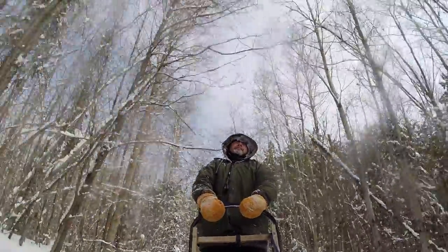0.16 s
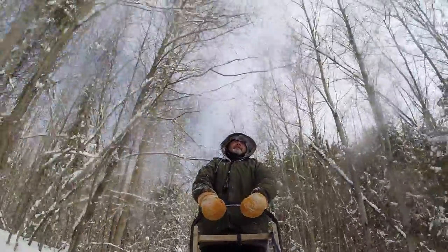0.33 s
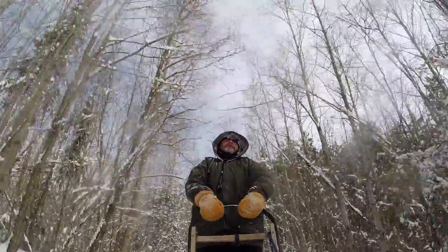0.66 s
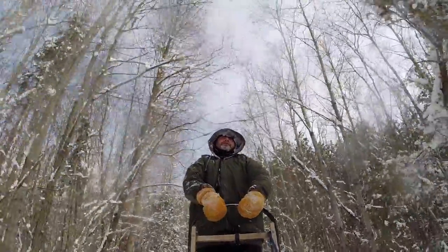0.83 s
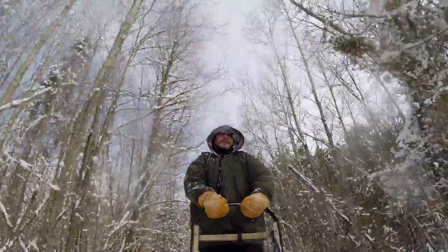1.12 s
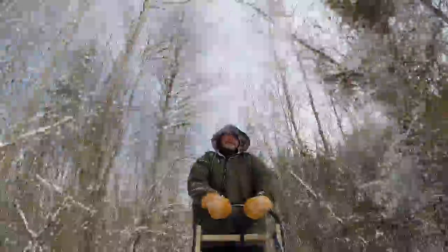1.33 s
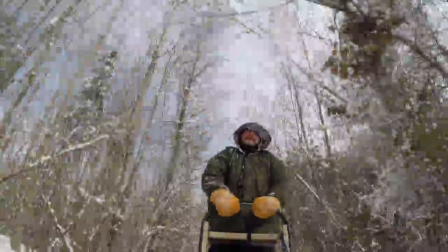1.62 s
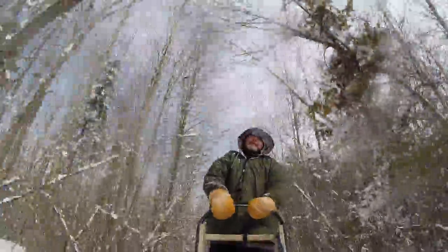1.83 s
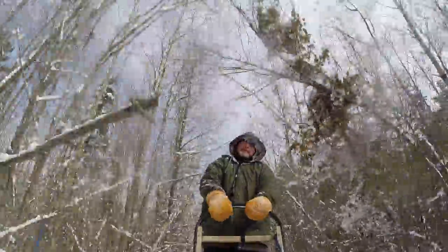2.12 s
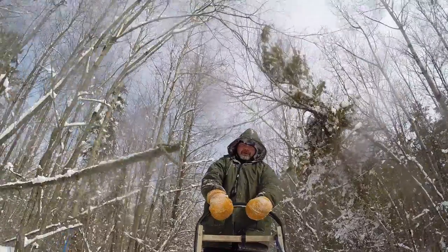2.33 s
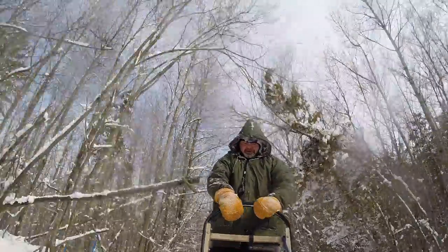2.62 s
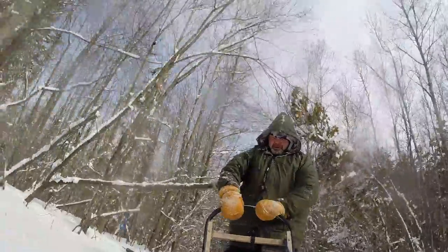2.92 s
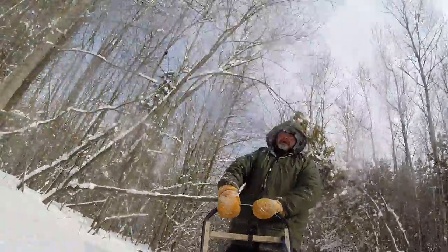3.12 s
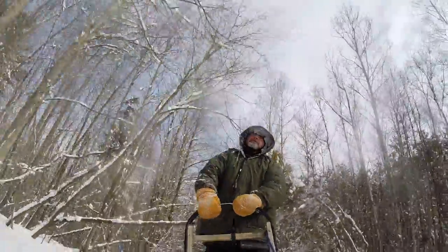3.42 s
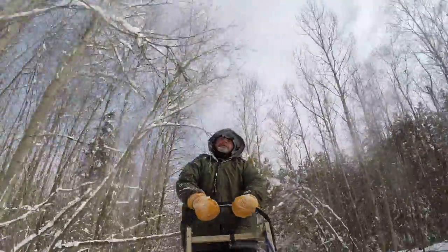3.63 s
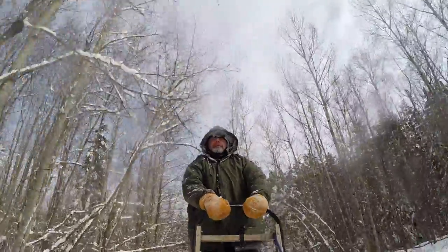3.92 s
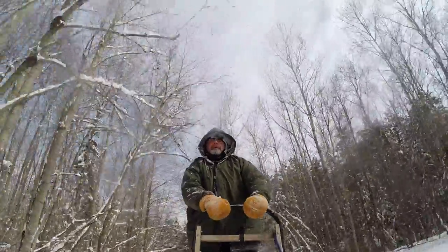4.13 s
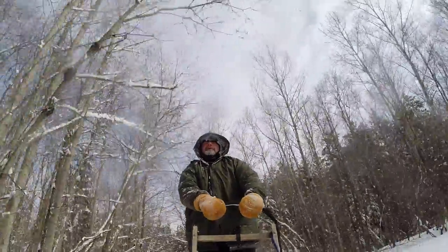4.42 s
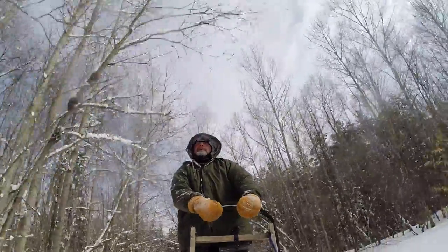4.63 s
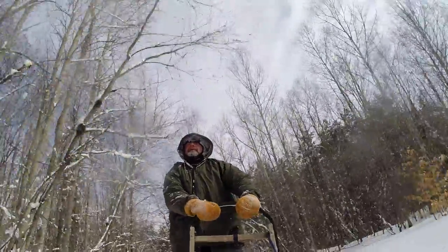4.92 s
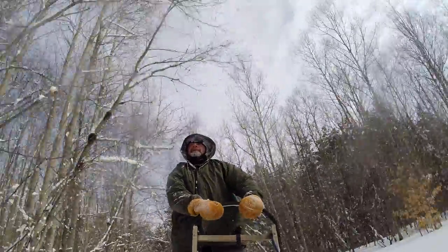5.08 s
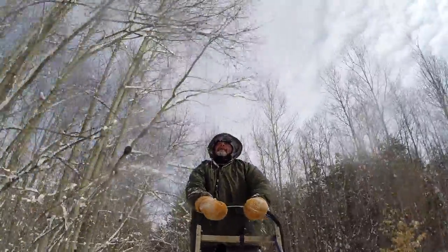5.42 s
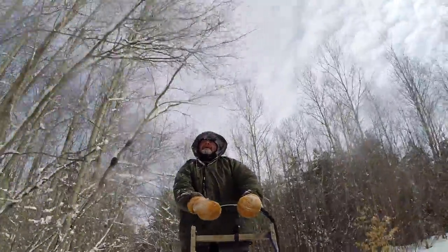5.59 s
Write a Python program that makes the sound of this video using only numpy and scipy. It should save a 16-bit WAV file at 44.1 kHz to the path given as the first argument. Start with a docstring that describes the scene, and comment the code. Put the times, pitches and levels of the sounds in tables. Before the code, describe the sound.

A man rides a wooden sled over snow through bare woods; the microphone sits in a closed case on the sled, so everything is close, mono, dull and boxy, without echo. At 0 s a low boom and deck drumming sit under a gritty grind, with several knocks up to 0.4 s. The grind dips near 0.4 s, then builds from 0.75 to a rough surge at 1.0-1.35 s. A hard knock and boom around 1.3 s open a dense, irregular rattle of wooden knocks. Light, dry case ticks chatter quickly from 1.4 to 2.5 s and again from 2.9 to 3.7 s, then become sparse. Knocks crowd at 2.7-2.85 s, and a short low groan sounds at 2.8-3.1 s. Grinding, thumps and knocks continue, surging near 4.85 s and after 5.5 s, with a firm late knock at 5.55 s. Lumpy wind rumble and very faint hiss persist, with no clean ending.

```python
"""Low drumming and booming under a gritty grind, soon struck through by knocks: a wooden sled runs fast over snow.
Crushed grains under the runners excite the modes of the frame; loose joints close with blows, and a loaded
runner groans. Random bumps drive the deck, and noise in narrow resonators makes the boom. The microphone sits
in a closed case fixed to the sled: the case ticks against its mount, smooth band noise makes a faint hiss of
spray, and low-passed noise makes the rumble of wind pressing on it."""
import sys
import numpy as np
from scipy import signal
from scipy.fft import next_fast_len
from scipy.io import wavfile
from scipy.ndimage import uniform_filter1d

SR = 44100
rng = np.random.default_rng(int(sys.argv[2]) if len(sys.argv) > 2 else 0)


def persist_wave(psi):
    """Save psi, clipped to +-1, as 16-bit WAV."""
    counts = np.round(np.clip(psi, -1, 1) * 32767).astype(np.int16)
    wavfile.write(sys.argv[1], SR, np.atleast_2d(counts).T)


N = 253575

# runners crushing snow: [t/s, level/dB before the case muffles it]
GRIND_LEVEL = [(0.0, -25.5), (0.19, -24.5), (0.36, -34), (0.75, -28), (1.02, -23.5), (1.23, -22),
               (1.34, -23), (1.39, -34), (1.48, -29.5), (1.58, -24), (1.66, -27), (2.1, -29), (2.37, -27.5),
               (2.64, -26), (2.74, -22), (2.99, -24), (3.25, -34), (3.52, -24), (3.63, -29), (4.0, -29.5),
               (4.11, -25), (4.61, -26.5), (4.85, -21), (5.14, -24.5), (5.57, -21.5), (5.75, -27)]
# modes of frame and case: [f/Hz, width/Hz, relative level/dB under the grind, relative level/dB under a knock]
FRAME_MODES = [(394, 240, -1.5, -37.5), (480.3, 149, 4, 10.5), (570, 191, 8, 12.5), (786, 12, -1, -2.5),
               (876, 63, -8, -37.5), (1118.6, 142, 7, 6.5), (1314, 66, 3.5, -21), (1605.5, 192, 6.5, 8),
               (2276, 250, -2.5, 4), (3320, 930, -28.5, -24), (3680, 100, -39.5, -20.5),
               (4600, 300, -29, -51.5), (7300, 1900, -63, -44)]
# loose joints closing: [t/s, relative peak level/dB, high modes re peak/dB, low modes re peak/dB]
JOINT_KNOCKS = [(0.098, -2.5, -4, -10.5), (0.14, -18.5, -21, 2), (0.215, 6.5, -8, -11),
                (0.391, 2, -27.5, -13), (0.883, -15, -2, -3.5), (0.984, -25.5, -13, 10.5),
                (1.02, -15, 1, 6.5), (1.254, -10, -0.5, -4), (1.35, 10, -30, -26), (1.397, 0.5, -29, -22),
                (1.408, -8.5, -8.5, -7.5), (1.472, -9, -19, -15), (1.528, -15, 0.5, -13),
                (1.571, -19, -14, 0), (1.624, 2.5, -21, -18), (1.644, -13, -20, -13),
                (1.688, -9.5, -9, -28), (1.766, -9.5, -9, -17), (1.815, -9.5, 0.5, -3),
                (1.852, -7, -21, -17), (1.866, -12, -7, -8), (1.885, -5, -7.5, -13), (2.09, -13.5, -8, -27),
                (2.197, -3, -9.5, -8.5), (2.233, 2, -35, -18.5), (2.323, 2, -22, -15),
                (2.353, -13.5, -5, -13), (2.373, -5, -14, -11), (2.494, -2, -13.5, -6.5),
                (2.518, -4, -33, -12), (2.598, 3.5, -37, -19.5), (2.68, 0.5, -26, -17),
                (2.695, -3, -7.5, -14), (2.735, 2, -27, -17), (2.754, -5.5, -18, -10),
                (2.776, -5.5, -4, -10), (2.792, -3, -8.5, -14), (2.81, -6, -12, -25), (2.83, -6, -14, -12),
                (2.849, -11, -7, -11), (2.916, -19, -21, -6), (3.067, -12.5, -6, 3.5),
                (3.154, 3.5, -45, -17), (3.18, -6.5, -28, -14), (3.203, -7.5, -32, -13),
                (3.265, -8, 0, -3.5), (3.376, -5.5, -18, -14), (3.472, -1.5, -17, -10),
                (3.531, -17, -22, -11), (3.581, -4, -24, -7), (3.587, -9, -6, -9),
                (3.639, -4.5, -21, -12.5), (3.652, -12.5, -21, -2), (3.711, 4.5, -24, -16),
                (3.742, -6, -31, -16), (3.825, 0.5, -17, -11), (3.87, -5, -8, -4),
                (3.931, -3, -16.5, -11.5), (3.95, -5.5, -11.5, -8), (4.096, -6.5, 1, -2.5),
                (4.154, -14.5, -27, -3), (4.193, -8.5, -35, -4.5), (4.276, -2.5, -33, -12.5),
                (4.454, -1, -17, -16), (4.524, -2, -12, -4.5), (4.535, -6, -25, -3), (4.714, -10.5, -2, -7),
                (4.792, -11.5, -22, -5), (4.829, 1, -38, -21), (4.849, -5.5, -19, -2),
                (4.942, 2.5, -41, -14), (5.303, -4.5, -22, -9), (5.323, -11, -12, -5),
                (5.357, -2, -15, -15), (5.405, -19.5, 2, 4), (5.55, 5, -9, -12), (5.622, -9, -30, -6),
                (5.721, 0.5, -13, -11)]
# loaded runner: [t/s, level/dB]
GROAN_LEVEL = [(2.78, -65), (2.84, -20.5), (2.89, -23), (2.95, -32.5), (3.03, -16.5), (3.1, -70)]
# lowest bending mode of the frame: [f/Hz, width/Hz of the narrowest pass]
BENDING_MODE = (84.5, 8.6)
# swing of the lowest bending mode: [t/s, level/dB]
BOOM_LEVEL = [(0.0, -16.5), (0.3, -20.5), (0.609, -31.5), (1.181, -25), (1.309, -11), (1.38, -27),
              (1.87, -28), (2.11, -15.5), (2.37, -33), (2.47, -24), (2.61, -30.5), (3.04, -19),
              (3.1, -32.5), (3.28, -20), (3.91, -28), (3.97, -47), (4.11, -18), (4.24, -30.5), (5.351, -22),
              (5.46, -41), (5.59, -19), (5.75, -24.5)]
# modes of the deck: [f/Hz, width/Hz, relative level/dB]
DECK_MODES = [(166, 42, -10.5), (198.3, 22, -1), (221.5, 13, -8), (125, 32, -15.5)]
# deck drumming: [t/s, level/dB]
DECK_LEVEL = [(0.0, -10), (0.05, -30.5), (0.14, -16), (0.3, -33), (0.4, -28.5), (0.49, -36), (1.28, -17),
              (1.49, -34.5), (1.58, -17.5), (1.76, -26.5), (2.05, -18), (2.1, -27), (2.51, -22),
              (2.58, -32.5), (2.77, -18.5), (2.91, -19), (2.95, -13.5), (3.14, -28), (3.35, -26.5),
              (3.54, -14.5), (3.62, -25.5), (3.79, -22.5), (3.84, -27), (4.02, -31), (4.11, -16),
              (4.16, -29), (4.26, -22.5), (4.31, -29), (4.55, -20), (4.6, -29), (4.68, -23), (4.8, -16.5),
              (5.03, -25.5), (5.04, -19.5), (5.09, -31.5), (5.56, -18), (5.7, -35), (5.75, -15)]
# case touching its mount: [t/s, relative level/dB]
CASE_TICKS = [(0.1868, -29.5), (0.214, -27), (0.236, -32), (0.253, -31), (0.302, -38), (0.369, -37),
              (0.585, -49), (0.601, -37.5), (0.7227, -55), (0.7895, -46), (0.863, -42), (0.9202, -45),
              (0.9846, -45), (1.02, -43), (1.0424, -43), (1.1074, -49), (1.2824, -40), (1.436, -24.5),
              (1.458, -35), (1.4875, -37), (1.5854, -22), (1.606, -44), (1.616, -37), (1.646, -31),
              (1.6763, -31), (1.705, -22.5), (1.732, -28.5), (1.769, -27), (1.8327, -42), (1.856, -35.5),
              (1.9327, -27.5), (1.975, -35.5), (2.0373, -24.5), (2.047, -39), (2.0758, -26.5),
              (2.109, -28.5), (2.139, -29), (2.1713, -31), (2.2035, -27), (2.235, -26), (2.2623, -36),
              (2.3048, -24), (2.3296, -35), (2.378, -29), (2.4535, -34), (2.8844, -39), (2.8945, -34),
              (2.9504, -37), (2.9775, -27.5), (3.005, -32), (3.0335, -37), (3.065, -27), (3.1, -28),
              (3.123, -36), (3.1606, -29.5), (3.1894, -36), (3.224, -27.5), (3.283, -35.5), (3.356, -35),
              (3.376, -29.5), (3.4186, -38), (3.483, -25), (3.515, -28), (3.551, -24.5), (3.612, -37),
              (3.6538, -33), (3.9402, -34), (4.01, -31), (4.338, -35), (4.3895, -44), (4.526, -42.5),
              (4.91, -35), (5.3028, -43), (5.3783, -44), (5.5049, -44), (5.538, -39), (5.67, -45)]
# modes of the case: [f/Hz, width/Hz, relative level/dB]
CASE_MODES = [(3365, 1300, 1.5), (4720, 2000, 8), (5990, 2350, 1.5), (8700, 4900, -11.5), (11000, 440, -17),
              (14800, 1200, -22.5)]
# wind pressing on the case: [t/s, level/dB]
WIND_LEVEL = [(0.0, -24), (0.2, -16), (0.45, -30), (1.12, -20), (2.08, -22), (2.2, -22), (2.8, -30),
              (3.0, -21), (3.3, -26.5), (3.55, -15.5), (3.7, -26), (5.33, -26.5), (5.41, -23), (5.75, -24)]
# cancellation between modes inside the closed case: [f/Hz, width/Hz]
CASE_NULLS = [(1450, 120), (1990, 170), (2870, 350)]

GRAINS_PER_S, GRAIN_SPREAD_DB = 3500.0, 3.6     # mid rate, about which clumps come and go
DRY_HISS_DB = -26           # bright part of the grind, re the grind level
DECK_RUBS = 0.33            # share of the deck's level swing in dB that the low frame modes follow
LOW_BELOW_HZ, HIGH_ABOVE_HZ = 850, 1400         # bounds of the low and high frame modes
SMALL_KNOCKS_PER_S, SMALL_KNOCK_DB = 200, 19.5  # force level re the grind level
BLOW_SPREAD_DB = 1.2        # each mode's share of a blow varies
SHUDDER_AFTER_S, SHUDDER_COLOUR = 0.005, 0.4    # late, with a weaker tilt between modes than the blow
KNOCK_DAMPING = 1.45        # a closed joint damps the modes: factor on their width
REBOUND_S, REBOUND_DB, REBOUND_SPREAD_DB = 0.003, 2, 1.5    # typical second touch of a firm tick
SINGLE_BELOW_DB = -44.5     # table level at or below which a tick touches once
LOOSE_S, STRAY_SPREAD_DB = 0.041, 3.6           # stray ticks crowd in this window about the clear ones
BUMP_EVEN = 1.6             # the larger, the freer deck and wind swing about their level
AIR_HISS_DB, AIR_HISS_TOP_HZ = -81.5, 12000
MUFFLE_HZ = 6500
LIMIT_DB, LIMIT_RELEASE_DB_PER_S = -2, 107
CUTOFF_HZ = 16300


def grind(grind_db, dry_db, deck_db):
    """Modal excitation by random impulses: clumps of crushed grains drive flickering modes, the low with the deck."""
    rate = GRAINS_PER_S * from_db(3.0 * drift(60))
    force = grains(rate, GRAIN_SPREAD_DB) * from_db(1.7 * drift(26.0))
    rub_db = DECK_RUBS * (deck_db - deck_db.mean())
    rung = []
    for hz, width_hz, db, _ in FRAME_MODES:
        mode_db = db + 1.37 * drift(5.4) + (hz < LOW_BELOW_HZ) * rub_db
        rung.append(from_db(mode_db) * through_frame(force, hz, width_hz))
    body, hiss = sum(rung[:-4]), sum(rung[-4:])     # the four highest modes form the hiss
    return from_db(grind_db) * rms_one(body) + from_db(grind_db + dry_db) * rms_one(hiss)


def knocks(grind_db):
    """Impact response: blow, bounce and dying shudder ring the modes; weak random blows follow the grind level."""
    s, peak_db, high_db, low_db = np.transpose(JOINT_KNOCKS)
    at = (s * SR).astype(int)
    chance = rng.standard_normal((len(at), len(FRAME_MODES) + 3))
    bounce = at + (SR * (0.0018 + 0.00025 * chance[:, 0])).astype(int)
    bounce_gain = 0.74 * from_db(0.5 * chance[:, 1])
    small = grains(SMALL_KNOCKS_PER_S, 0.74) * from_db(grind_db + SMALL_KNOCK_DB)
    shaking = grains(2100.0, 1.3)
    fade = np.exp(-1 / (0.0074 * SR))   # the shudder decays with a 7.4 ms time constant
    out = np.zeros(N)
    for k, (hz, width_hz, _, db) in enumerate(FRAME_MODES):
        colour_db = low_db if hz < LOW_BELOW_HZ else high_db if hz > HIGH_ABOVE_HZ else 0
        blow = np.zeros(N)
        blow[at] = from_db(peak_db + colour_db + 24.0 + BLOW_SPREAD_DB * chance[:, k + 2])
        late = np.zeros(N)
        late[at + int(SHUDDER_AFTER_S * SR)] = blow[at] * from_db((SHUDDER_COLOUR - 1) * colour_db)
        shudder = from_db(-20.5) * shaking * signal.lfilter([1], [1, -fade], late + 1e-18)
        blow[bounce] += blow[at] * bounce_gain
        stray = small * from_db(3.0 * drift(30))
        force = blow + shudder + stray
        rung = through_frame(force, hz, KNOCK_DAMPING * width_hz, spread=1.5)
        out += (-1) ** k * from_db(db) * rung       # neighbouring modes have opposite sign
    return low_pass(low_pass(out, 3200), 2240)      # wood on wood: a soft contact


def groan():
    """Forced resonance: leaning into the bend loads one runner and drives a low mode hard for a moment."""
    level_db, = in_time(GROAN_LEVEL)
    return from_db(level_db) * rms_one(through_frame(grains(400.0, 0.9), 357, 53))


def frame_low(boom_db, deck_db):
    """Random vibration: noise sustains the lowest bending mode, and bumps in the trail drive the deck modes."""
    hz, width_hz = BENDING_MODE
    boom = resonate(rng.standard_normal(N), hz, width_hz)
    boom = resonate(boom, hz, 4.6 * width_hz)
    boom = resonate(evened(boom, 0.4), hz, 3.0 * width_hz)      # steady drive evens the swing
    boom = boom * from_db(2.0 * drift(6))
    bumps = grains(250.0, 4.7)
    deck = sum(from_db(db) * resonate(bumps, f, w) for f, w, db in DECK_MODES)
    deck = evened(low_pass(deck, 440), BUMP_EVEN)
    return from_db(boom_db) * rms_one(boom) + from_db(deck_db) * rms_one(deck)


def ticks():
    """Contact chatter: brief touches, doubled in a firm tick, ring the case modes and leave a faint crackle."""
    force, t = np.zeros(N + 2600), np.arange(2600) / SR
    chatter = rng.standard_normal((len(CASE_TICKS), 2603))
    for (s, db), rough in zip(CASE_TICKS, chatter):
        length_s = 0.0011 * from_db(3.0 * rough[0])
        decay = np.exp(-t / length_s) + from_db(-35) * np.exp(-t / 0.006)
        touch = (1 - np.exp(-t / 0.00074)) * decay
        rebound_s = REBOUND_S * from_db(4.1 * rough[1])
        again = np.interp(t - rebound_s, t, touch, left=0)
        again = again * from_db(REBOUND_DB + REBOUND_SPREAD_DB * rough[2])
        shape = touch + (db > SINGLE_BELOW_DB) * again
        shape = shape / np.linalg.norm(shape)
        force[int(s * SR):][:2600] += from_db(db + 17.5) * np.sign(rough[3:]) * shape
    force = force[:N]
    loose = uniform_filter1d(np.abs(force), int(LOOSE_S * SR))  # how loosely the case sits just now
    scratches = signal.lfilter([1], [1, -0.96], grains(200.0, STRAY_SPREAD_DB))
    stray = scratches * rng.standard_normal(N)
    force = force + from_db(-1) * loose * stray
    force = force + from_db(-33.5) * loose * rng.standard_normal(N)     # a fine fizz between ticks
    return sum(from_db(db + 2.5 * drift(40)) * through_frame(force, hz, w) for hz, w, db in CASE_MODES)


def wind(wind_db):
    """Turbulent pressure: lumpy low-passed noise on the case, far below the tabled frame modes."""
    gusts = low_pass(low_pass(rng.standard_normal(N), 26), 40) * from_db(1.0 * drift(5.0))
    pressure = signal.lfilter([1, -1], [1, -0.998], gusts)      # removes the slowest swings
    return from_db(wind_db) * rms_one(low_pass(evened(pressure, BUMP_EVEN), 65))


def spray():
    """Broadband flow noise: fine snow and air passing the case as a smooth, faint hiss."""
    band = signal.butter(6, [5000, AIR_HISS_TOP_HZ], "band", fs=SR, output="sos")
    hiss = signal.sosfilt(band, low_pass(rng.standard_normal(N), 15000))
    return from_db(AIR_HISS_DB + 1.5 * drift(3.0)) * rms_one(hiss)


def muffled(x):
    """Modal cancellation and treble loss: the closed case cuts notches and dulls the top."""
    for hz, width_hz in CASE_NULLS:
        x = x - 0.62 * resonate(x, hz, width_hz)
    return low_pass(low_pass(x, MUFFLE_HZ), 1.08 * MUFFLE_HZ)


def through_frame(x, hz, width_hz, spread=0.89):
    """Coupled resonance: frame and case pass a mode twice, so the valleys between modes stay dark."""
    return resonate(resonate(x, hz, width_hz), hz, spread * width_hz)


def resonate(x, hz, width_hz):
    """Damped resonance: one mode of peak gain 1; modes summed in phase leave notches between them."""
    r = np.exp(-np.pi * width_hz / SR)
    poles = [1, -2 * r * np.cos(2 * np.pi * hz / SR), r * r]
    return signal.lfilter([(1 - r * r) / 2, 0, (r * r - 1) / 2], poles, x + 1e-18)


def grains(per_s, spread_db):
    """Random impulse process: sparse clicks of uneven size and sign."""
    sizes = from_db(spread_db * np.minimum(rng.exponential(1, N), 4)) * rng.choice([-1, 1], N)
    return sizes * (rng.random(N) < per_s / SR)


def drift(hz):
    """Low-passed random motion: a slow wander of spread 1."""
    r = np.exp(-80 * np.pi * hz / SR)   # computed on every 40th sample
    noise = rng.standard_normal(N // 40 + 2002)
    slow = signal.lfilter([1], [1, -2 * r, r * r], noise)[2000:]    # the settled part
    return np.interp(np.arange(N) / 40, np.arange(len(slow)), rms_one(slow))


def evened(x, free):
    """Envelope compression: swings are pressed toward a steady level, less so for a larger free."""
    envelope = np.abs(signal.hilbert(x, next_fast_len(N))[:N])
    return x / (envelope + free * x.std())


def low_pass(x, hz):
    """Second-order low-pass filtering: treble above the corner falls away."""
    return signal.sosfilt(signal.butter(2, hz, fs=SR, output="sos"), x)


def in_time(rows):
    """Linear interpolation: table columns become one value per sample."""
    s, *columns = np.transpose(rows)
    return [np.interp(np.arange(N) / SR, s, c) for c in columns]


def from_db(db):
    """Logarithmic level: decibels to amplitude gain."""
    return 10 ** (np.asarray(db) / 20)


def rms_one(x):
    """Power normalisation: scale to unit rms."""
    return x / np.sqrt(np.mean(x ** 2) + 1e-20)


def scene():
    """Superposition: grind and knocks are muffled by the case, and the other sources add directly."""
    levels = map(in_time, (GRIND_LEVEL, BOOM_LEVEL, DECK_LEVEL, WIND_LEVEL))
    (grind_db,), (boom_db,), (deck_db,), (wind_db,) = levels
    runners = muffled(grind(grind_db, DRY_HISS_DB, deck_db) + knocks(grind_db))
    return (runners + ticks() + spray() + groan() + frame_low(boom_db, deck_db) + wind(wind_db))[None]


def record(dry):
    """Peak limiting: gain ducks at the hardest blows and recovers fast; then the top is cut."""
    ramp = LIMIT_RELEASE_DB_PER_S * np.arange(N) / SR
    over_db = np.maximum(20 * np.log10(np.abs(dry[0]) + 1e-9) - LIMIT_DB, 0)
    held_db = np.maximum.accumulate(over_db + ramp) - ramp
    ahead_db = np.append(held_db[60:], held_db[-60:])   # looks 60 samples ahead
    duck_db = signal.lfilter([0.02], [1, -0.98], ahead_db)
    top_cut = signal.cheby2(10, 60, CUTOFF_HZ, fs=SR, output="sos")
    return signal.sosfilt(top_cut, dry * from_db(-duck_db))


dry = scene()
out = record(dry)
persist_wave(out)
```